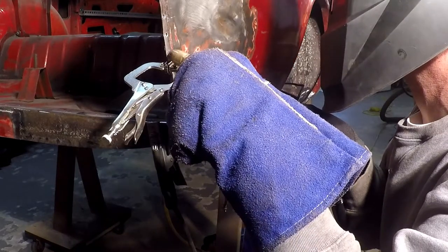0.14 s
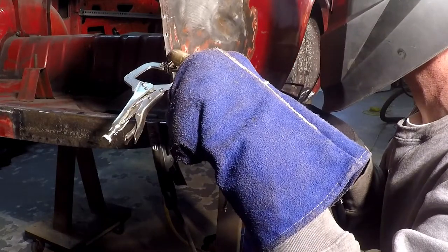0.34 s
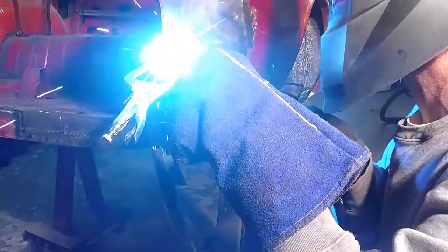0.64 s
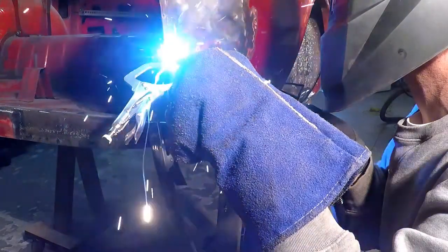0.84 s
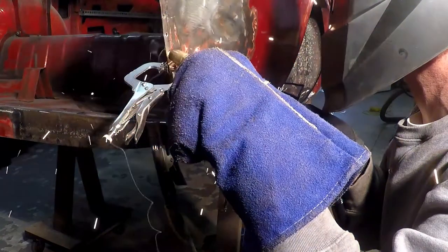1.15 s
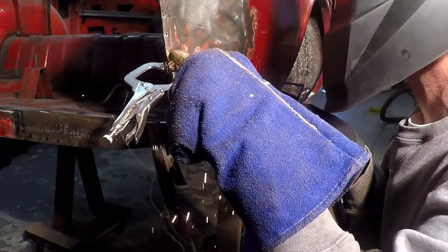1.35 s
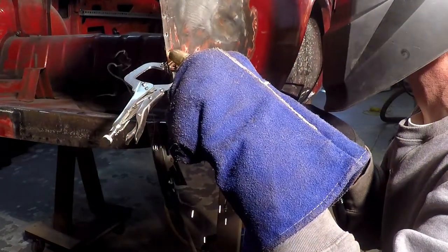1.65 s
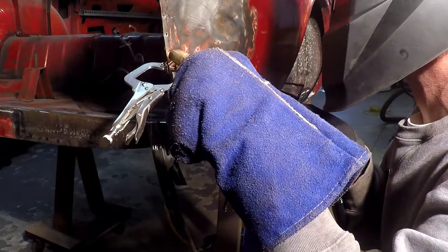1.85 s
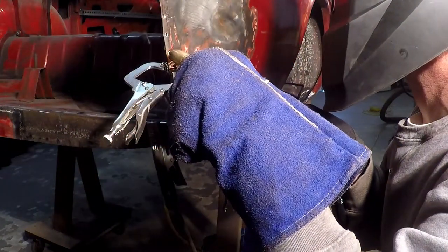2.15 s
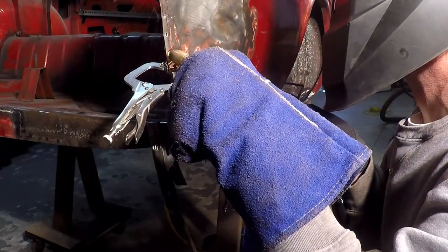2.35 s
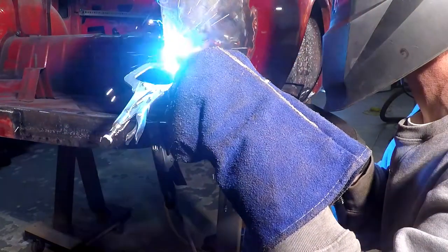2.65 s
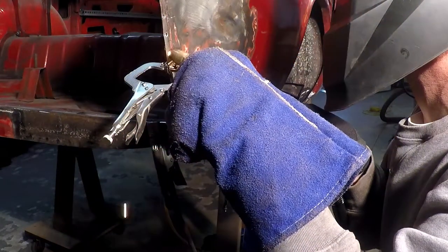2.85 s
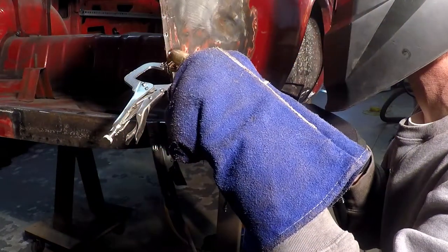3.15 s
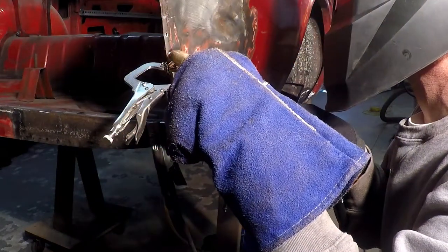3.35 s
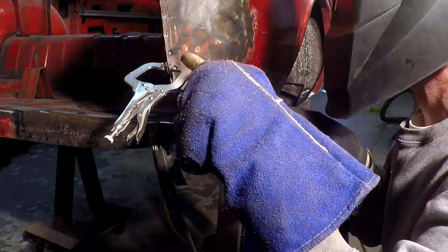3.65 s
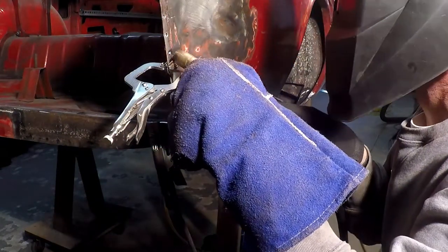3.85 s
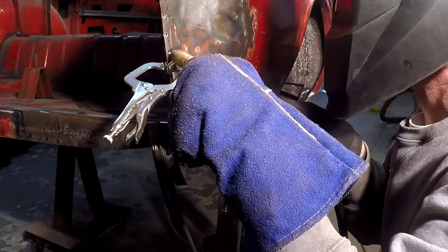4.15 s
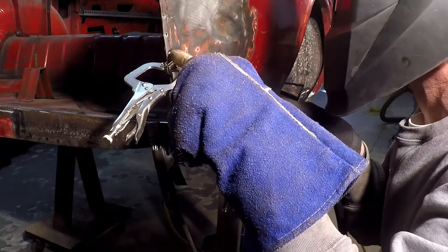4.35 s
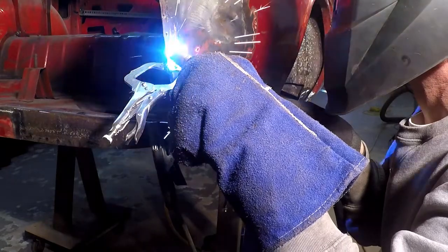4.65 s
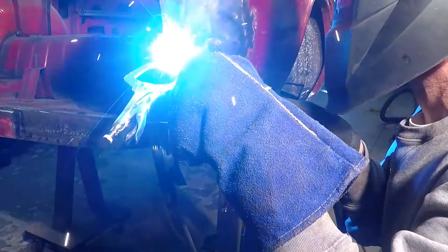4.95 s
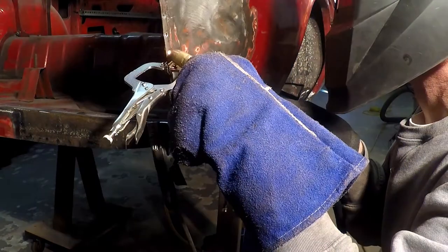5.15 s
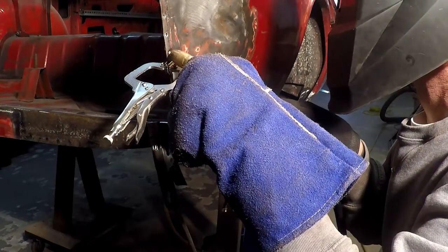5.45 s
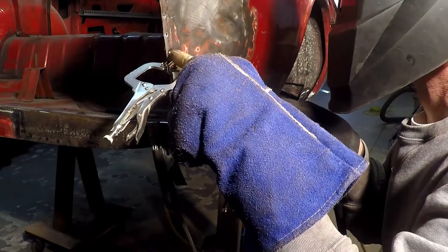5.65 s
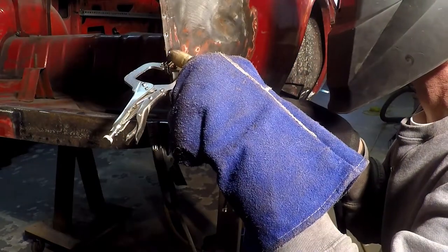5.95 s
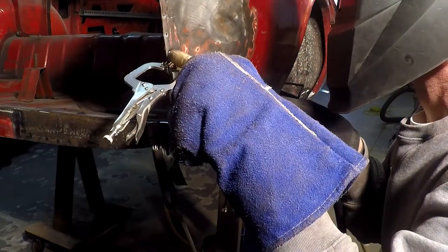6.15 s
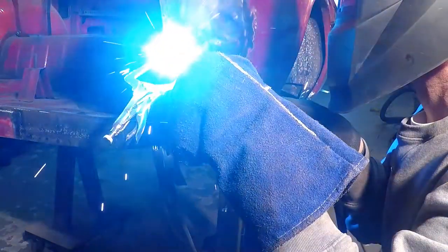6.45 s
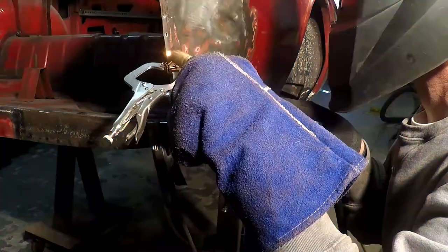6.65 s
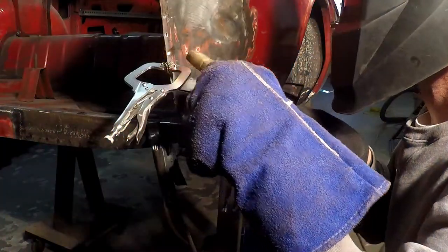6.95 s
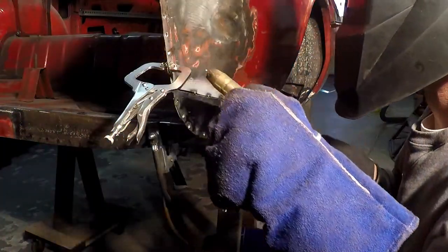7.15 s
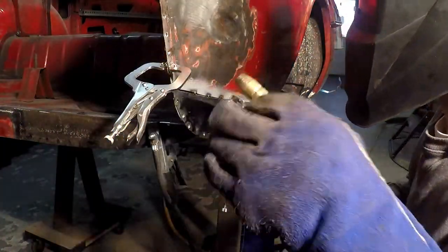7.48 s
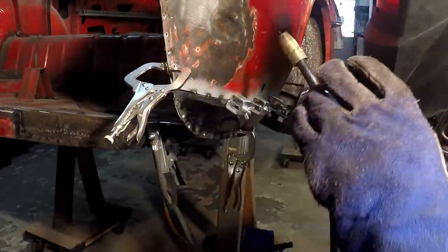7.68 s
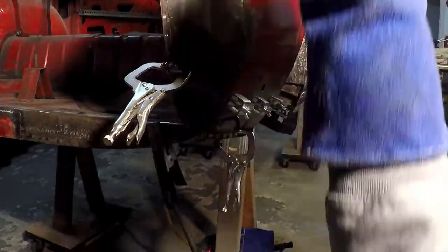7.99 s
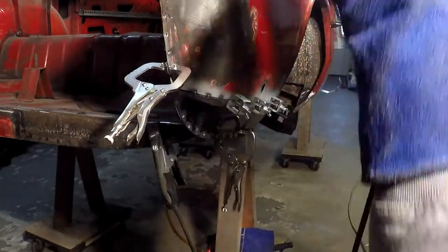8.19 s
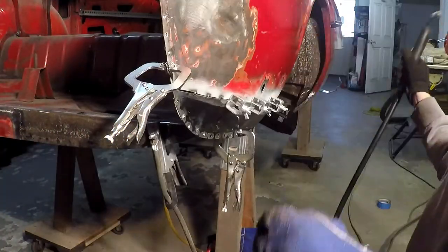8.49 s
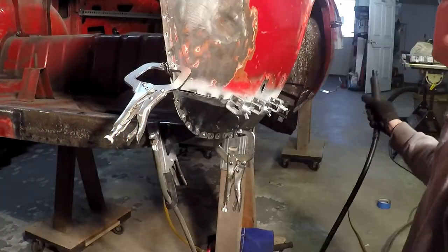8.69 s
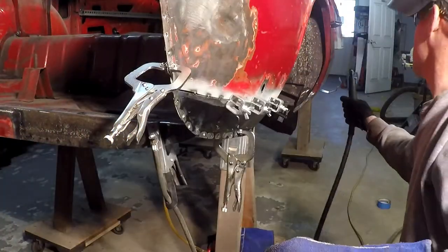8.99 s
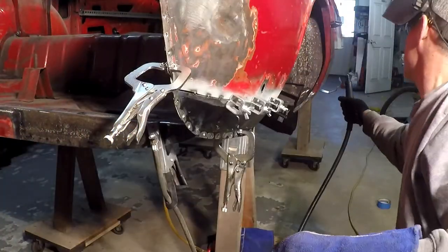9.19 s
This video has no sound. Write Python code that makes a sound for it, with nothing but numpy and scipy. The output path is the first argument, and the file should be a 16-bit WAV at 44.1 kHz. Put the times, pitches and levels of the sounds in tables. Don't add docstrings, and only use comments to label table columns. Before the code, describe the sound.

In a garage, a fan drones low through ductwork with a wavering hum. Four times a trigger clicks, gas and wire feed hiss briefly, and a welding arc spits loud irregular pops over a sizzle for about half a second. The drone ducks under each weld and creeps back. Finally, torch cable fittings tick and clink lightly. Close stereo camera microphone.

```python
import sys
import numpy as np
from scipy import signal
from scipy.fft import rfft, irfft, next_fast_len
from scipy.io import wavfile
from scipy.ndimage import uniform_filter1d, map_coordinates

SR = 44100
rng = np.random.default_rng(int(sys.argv[2]) if len(sys.argv) > 2 else 0)


def boost(x):
    u = np.asarray(x, float) / 20
    return 10 ** u


def master_out(mix):
    frames = np.transpose(np.atleast_2d(mix))
    ceiling = np.clip(frames, -1, 1)
    pcm = np.round(ceiling * 32767).astype(np.int16)
    wavfile.write(sys.argv[1], SR, pcm)


N = 411144
CLOCK = np.arange(N) / SR

# frequency in Hz, density in dB per Hz.
FAN_SPECTRUM = [(20, -34.5), (105, -32.5), (130, -35.5), (165, -6.5), (230, -6.5), (310, -14), (550, -16.5),
                (780, -17.5), (1100, -28), (1800, -41.5), (2500, -52), (4500, -55.5), (6500, -59),
                (10500, -65), (12700, -70), (13500, -100)]
# centre in Hz, width in Hz, height in dB.
DUCT_MODES = [(182, 17, 4), (341.4, 24, 3.5), (389.5, 14, 5.5), (604.3, 71, 8.5), (695.4, 11, 10),
              (767.4, 22, 7.5), (963, 25, 4), (1214, 7.7, 3), (1333, 15, 3), (1487, 16, 1)]
# centre in seconds, change in dB.
NOTE_SWELLS = [(.25, 3), (.49, -3.5), (.62, -0.5), (1.6, 4), (1.88, -1), (2.02, 5), (2.23, 8.5),
               (3.08, 2.5), (3.18, 4.5), (3.34, 8), (3.44, 5), (4.12, 5), (4.3, 0.5), (4.69, 5.5),
               (5.43, 4.5), (6.15, 6.5), (6.93, 4.5), (7.13, -4), (7.17, 5), (8.0, 3), (8.17, 5), (8.37, 2),
               (8.49, 4.5), (8.8, -1), (8.93, 4), (9.13, 6), (9.28, 1.5)]
# centre in seconds, change in dB.
NOTE_CHOKES = [(.67, -21), (.85, -15), (1.0, -6), (1.23, -17), (1.55, -23), (1.96, -15), (2.1, -11),
               (2.49, -12), (2.69, -11.5), (2.92, -14), (3.14, -5), (3.27, -21), (3.38, -25), (3.59, -5),
               (3.65, 2), (4.23, -4.5), (4.88, -9), (5.15, -13.5), (5.22, -24), (5.47, -13.5), (5.68, -7.5),
               (6.38, -4.5), (6.54, -14), (6.61, -4.5), (6.82, -7.5), (8.12, -21), (8.3, -23.5),
               (8.71, -15), (9.01, -6), (9.24, -6.5)]
# centre in seconds, frequency in Hz, level in dB.
PANEL_FLEXES = [(0.64, 158.8, -14), (2.4, 153, -17), (4.6, 155.9, -20.5), (6.297, 167, -17.5),
                (0.63, 110, -36.5), (2.56, 110, -38.5), (6.27, 270, -17), (.55, 310, -20.5),
                (3.1, 375, -26), (6.6, 430, -14), (4.74, 660, -27.5)]
# time in seconds, peak in dB, ring in dB, own note in Hz.
CABLE_TICKS = [(7.7859, -42, -7, 3810), (7.807, -34, -3.5, 4400), (7.8283, -36.5, -7, 5700),
               (7.8501, -48, 2, 4495), (7.943, -57, 6, 4278), (8.009, -33.5, -1, 5860),
               (8.0515, -36.5, -5, 3900), (8.094, -30.5, -3, 5870), (8.2885, -25.5, -7, 5830),
               (8.298, -33, 1, 6160), (8.3235, -40, -5, 3560), (8.5345, -28.5, -7, 5920),
               (8.547, -29, 1, 5910), (8.573, -28.5, -2, 5860), (8.607, -31, -0.5, 5930),
               (8.613, -34.5, -6, 7540)]
# frequency in Hz, level in dB, 60 dB decay in seconds.
FITTING_MODES = [(4400, -12, .03), (5780, -9, .09), (5960, -7, .12), (6150, -9, .08), (6500, -11, .04),
                 (7000, -6, .04), (7300, -8, .06), (7550, -8, .04)]
# frequency in Hz, density in dB per Hz.
SCUFF_SPECTRUM = [(700, -24), (1500, 11.5), (2500, -2), (4500, 0), (7000, -5), (10000, -4.5), (11500, -7),
                  (13000, -10.5), (14000, -33.5), (16000, -75)]
# time in seconds, level in dB.
CABLE_CLINKS = [
    (8.0188, -39),
    (8.062, -34.5),
    (8.1056, -31.5),
    (8.2993, -24),
    (8.5481, -29),
    (8.5822, -28.5),
    (8.615, -27.5),
]
# frequency in Hz, level in dB, 60 dB decay in seconds.
ARMATURE_MODES = [(433, 3, 0.082), (783, 7.5, 0.12), (1140, -1.5, 0.036), (1630, -0.5, 0.033),
                  (4440, 2.5, .03), (5060, 1.5, .035), (5650, -4.5, .03), (7700, -1, 0.022)]
# time in seconds, dB below 600 Hz, dB up to 3 kHz, dB above.
ARMATURE_CLACKS = [(0.407, -22, -23, -24), (0.409, -23, -26, -22), (2.379, -22, -28.5, -29),
                   (2.387, -7, -28, -28), (4.611, -18.5, -22, -21), (4.622, -19, -25.5, -27),
                   (4.642, -26, -29.5, -38), (6.143, -27, -27, -23.5), (6.15, -26.5, -26, -27),
                   (6.179, -31, -29, -43), (6.197, -29, -27, -36), (2.4, -18, -28, -35)]
# time in seconds, gas in dB, feeder in dB.
TRIGGER_PULLS = [
    (.39, 2, 2),
    (2.361, -1, -3.5),
    (4.597, 1, 1.5),
    (6.129, 0.5, 0),
]
# time in seconds, gas in dB, feeder in dB.
TRIGGER_RELEASES = [
    (1.059, -5, -2),
    (2.74, 1, 1),
    (5.0, 6, -4),
    (6.56, 2.5, 3.5),
]
# seconds since the pull, gas in dB, feeder in dB.
VALVE_OPENING = [
    (0, -56.5, -64),
    (.009, -43.5, -49.5),
    (.015, -30.5, -31),
    (.022, -25.5, -24),
    (.034, -28.5, -26),
    (.06, -38, -28),
    (.11, -39, -37),
    (.2, -62.5, -55.5),
    (.3, -70.5, -72.5),
]
# seconds since the release, gas in dB, feeder in dB.
FEED_COASTING = [
    (0, -66, -53),
    (.02, -48.5, -35),
    (.06, -53.5, -38),
    (.13, -61.5, -47.5),
    (.2, -80, -56.5),
]
# frequency in Hz, density in dB per Hz.
GAS_SPECTRUM = [(1500, -25.5), (2300, -7), (3800, -2.5), (4400, -12), (5200, -5), (6000, -3), (7500, -10.5),
                (8300, -13.5), (9600, -14.5), (12000, -23.5), (14200, -30.5), (14800, -70.5)]
# centre in Hz, width in Hz, height in dB.
HOSE_MODES = [(432, 27, 7.5), (1680, 790, -2.5), (4520, 280, 4.5), (5170, 210, 3.5), (7400, 320, 1)]
# frequency in Hz, density in dB per Hz.
FEEDER_SPECTRUM = [(250, -13), (450, 8.5), (900, -0.5), (1250, -1.5), (1600, -5), (1950, -10.5),
                   (2250, -19.5), (2600, -30), (4000, -43)]
# start in seconds, end in seconds, frequency in Hz, level in dB.
LINER_SQUEAKS = [
    (4.7, 4.76, 1530, -25.5),
    (4.75, 4.775, 1570, -26),
    (.465, .492, 1900, -31),
]
# frequency in Hz, density in dB per Hz.
SIZZLE_SPECTRUM = [(590, -27), (1000, 2), (1310, -4), (1560, 5), (2520, -18.5), (2820, 2), (4250, -10.5),
                   (6700, 5), (8310, -12), (9420, -5), (12500, -15.5), (15200, -37.5)]
# forms in seconds, full in seconds, arc falters in seconds, level in dB.
MOLTEN_POOLS = [
    (0.556, 0.578, 0.73, -27.5),
    (0.758, 0.836, 0.88, -24.5),
    (.92, 0.945, 1.043, -30.5),
    (2.439, 2.624, 2.834, -35.5),
    (4.636, 4.702, 4.776, -26),
    (4.87, 4.909, 4.96, -28),
    (6.22, 6.317, 6.15, -41),
    (6.36, 6.448, 6.65, -42),
]
# frequency in Hz, density in dB per Hz.
POP_SPECTRUM = [(600, -47.5), (1400, 0.5), (1950, 3), (2500, -4.5), (3500, -4), (6000, -0.5), (6900, 3.5),
                (7900, -12.5), (9400, -7.5), (10800, -10), (12200, -16), (15000, -12), (15900, -38),
                (16800, -61)]
# time in seconds, peak, thump, body and sharpness in dB.
FIRST_WELD = [(0.4887, -5, 7, 8, -7), (0.5544, 3, -6, -0.5, -1.5), (0.5639, -8, 1.5, 5, 2.5),
              (0.5772, -16, 4.5, 4, 2.5), (0.6175, 1.5, -6, -5, -1.5), (0.634, 0.5, -2, -7, -2),
              (0.645, -6.5, 2, -7, -1.5), (0.671, -8.5, 0.5, -0.5, 0), (0.6759, -3, 0.5, 6, -1.5),
              (0.6832, -4, 4, 3.5, -0.5), (0.69, -5, 5, 2.5, 2.5), (0.7645, 2, -3, -4, -0.5),
              (0.8114, -10, -0.5, 0, 2), (0.837, -5, -1, -5, -3), (0.8435, -5.5, -2.5, -7, -1.5),
              (0.8543, -6.5, -1.5, -1.5, 0), (0.865, -13, -2.5, -6, 4), (0.8703, -1, -3.5, -4, 0),
              (0.883, -4.5, -1, -6.5, 0), (0.889, -4.5, -2.5, -4, 0.5), (0.9462, -14, 0.5, 2.5, 0.5),
              (0.967, -3.5, 0.5, -2.5, 0), (0.971, -15, -1, 8.5, -0.5), (0.9737, -3, -2.5, -3, -1.5),
              (0.9854, -18.5, 4.5, -2, -0.5), (1.0229, -8.5, 10.5, -1, 2.5), (1.0748, -17, 14, -2, -6)]
# time in seconds, peak, thump, body and sharpness in dB.
SECOND_WELD = [(2.413, -3, 4, 2.5, 3.5), (2.4699, 2, -3.5, -3.5, 0.5), (2.4915, -15.5, 4, -9, 8),
               (2.4949, 0, -5.5, 3.5, -4), (2.5616, -2.5, 1, 2.5, 0.5), (2.5776, -2, -0.5, 0, -1.5),
               (2.5828, -4.5, -1.5, 5.5, -2.5), (2.5987, 0, -1.5, 0, -4.5), (2.6022, -10.5, 3.5, 1, 3),
               (2.6211, -4.5, 7, 2, -3.5), (2.6332, -5.5, -2.5, 4.5, -4), (2.6565, -8, -2, -0.5, -2.5),
               (2.6627, -19, 4, -5, 1.5), (2.6679, -7.5, 10, 8.5, -0.5), (2.6812, -7.5, 7, 0, -1),
               (2.6926, -7.5, 8, 5, -0.5), (2.705, -5, 7.5, 2, 4), (2.7181, -5, 3.5, 5.5, 1),
               (2.7311, -9.5, 5, 7, 4)]
# time in seconds, peak, thump, body and sharpness in dB.
THIRD_WELD = [(4.664, -4.5, 9, -1, -2.5), (4.7459, -14, 7.5, -2, 2), (4.752, -13, 3.5, -5.5, -1),
              (4.7632, -14, 3, -11, -2), (4.7665, 1, -1, 0.5, 0.5), (4.7799, -6.5, -6.5, 1, -1.5),
              (4.7843, -12.5, 3.5, -1, 1), (4.7954, -5, -1, 2.5, -4), (4.8062, -6, -2.5, 0, 1),
              (4.825, -5.5, 6, 4, 3.5), (4.8319, -0.5, -4.5, -8, -3.5), (4.8824, -2.5, -2.5, -3, -5),
              (4.902, -4.5, 3.5, 0.5, -3.5), (4.9076, -3, 3.5, 0, 0.5), (4.9251, -2, -3, -2, -3.5),
              (4.9357, -6, 5.5, 1, 0), (4.9483, -6.5, -6, -0.5, -0.5), (4.9628, -2.5, -4.5, -2, -1),
              (4.984, -8.5, 1, 0, 4), (4.9969, -10.5, 7, 7, -5.5)]
# time in seconds, peak, thump, body and sharpness in dB.
FOURTH_WELD = [(6.2073, -5, 1, -1.5, -2), (6.2262, 1, -7.5, -2.5, -0.5), (6.2885, -2, 0.5, 1, -3.5),
               (6.3034, -2.5, -2.5, 3, -1), (6.323, -2, -3, 1, -2), (6.3444, -20, 4.5, -7, 4),
               (6.3684, -6, 5.5, 2.5, -1.5), (6.3806, -8, 11.5, 8, -1.5), (6.3867, -9.5, 10.5, 8.5, 1.5),
               (6.4002, -15, 3.5, 6, -0.5), (6.41, -13, 6.5, 3, 2.5), (6.4241, -6.5, 4, -1, -4),
               (6.4331, -7, 3.5, 8.5, -4), (6.442, -10, 5, -0.5, -5), (6.451, -6.5, -6.5, 6, -2.5),
               (6.459, -6, -1, 0, -3.5), (6.4776, -5.5, 5.5, 5, -5.5), (6.4842, -16.5, -2.5, 6.5, -3),
               (6.499, -11.5, -0.5, 3, -2.5), (6.514, -9.5, 2, 6.5, -0.5), (6.5204, -9, 0, 10, 2),
               (6.536, -5, -3, -2, 0.5), (6.5493, -7, 3, -0.5, -4)]
# delay in seconds, level in dB.
NEAR_ECHOES = [(.006, -20), (0.012, -19), (0.0018, -23.5)]
# frequency in Hz, 60 dB decay in seconds.
GARAGE_DECAY = [(300, 0.065), (1000, 0.32), (1800, 0.23), (4000, 0.58), (7000, 0.46), (10000, 0.26),
                (12000, 0.2), (15000, 0.05)]
# frequency in Hz, level in dB, lead in radians, likeness of diffuse sound 0-1.
PORT_DIFFERENCE = [(40, -.3, 0, .6), (100, -.3, -.2, .6), (130, -1.5, -.2, 1), (200, -2.1, -.22, 1),
                   (300, -3.8, -.4, .98), (480, -9.5, -.65, .93), (630, -19, -1.8, .7),
                   (780, -11, -3.6, .93), (1100, -5.5, -4.05, .9), (1500, -4, -4.4, .8), (2100, 1, -5, .5),
                   (2450, 3, -5.8, .2), (2800, -1, -6.4, .3), (4500, -1, -6.15, .3), (7000, 2.3, -5.3, .05),
                   (8000, 2, -4.3, .05), (10000, -3.5, -7.3, .05), (12000, -2, -10.4, .1),
                   (15000, 0, -11, .1)]
# start in seconds, lowest at seconds, lowest in dB, fall in dB,
# recovery in dB per second.
GAIN_DUCKS = [
    (0.522, 0.787, -33, 13, 9),
    (2.586, 2.833, -31.5, 4, 9),
    (4.677, 5.003, -32.5, 10, 10),
    (6.209, 6.694, -28, 1.5, 8.5),
]


def unit(x):
    return x / np.sqrt(np.mean(x ** 2) + 1e-20)


def along(points, hz):
    f, *cols = np.transpose(points)
    return np.squeeze([np.interp(np.log(hz + 1), np.log(f + 1), c) for c in cols])


def curves(rows, outside=None):
    s, *cols = np.transpose(rows)
    return [np.interp(CLOCK, s, c, outside, outside) for c in cols]


def wobble(rate):
    knots = rng.standard_normal(int(N * rate / SR) + 4)
    return map_coordinates(knots, [np.arange(N) * rate / SR])


def filtered(x, response):
    m = 2 * next_fast_len(N // 2 + 8192)
    return irfft(rfft(x, m) * response(np.fft.rfftfreq(m, 1 / SR)), m)[..., :N]


def causal(spectrum):
    def response(hz):
        cepstrum = irfft(np.log(boost(along(spectrum, hz)) + 1e-4))
        cepstrum[1:len(hz) - 1] *= 2
        cepstrum[len(hz):] = 0
        return np.exp(rfft(cepstrum))
    return response


def noise(gain):
    return unit(filtered(rng.standard_normal((2, N)), gain))


def resonant_noise(spectrum, modes):
    def gain(hz):
        humps = sum(boost(db) / (1 + (2 * (hz - c) / w) ** 2) for c, w, db in modes)
        return boost(along(spectrum, hz)) * (1 + humps)
    return noise(gain)


def bumps(rows, width):
    return sum(db * np.exp(-((CLOCK - s) / width) ** 2) for s, db in rows)


def impulses(s, size):
    return np.bincount(np.round(s * SR).astype(int).ravel(), size.ravel(), N)


def resonator(hz, centre, width):
    return (1j * hz * width / (centre ** 2 - hz ** 2 + 1j * hz * width)) ** 2


def fan():
    gusts_db = .3 * wobble(7)
    return boost(7.0 + gusts_db) * resonant_noise(FAN_SPECTRUM, DUCT_MODES)


def drone():
    turn = 2 * np.pi * np.cumsum(192.7 + 1.94 * wobble(20)) / SR
    waver_db = 1.4 * wobble(13)
    level_db = 10 + bumps(NOTE_SWELLS, 0.034) + bumps(NOTE_CHOKES, .02) + waver_db
    return boost(level_db) * (np.sin(turn) + boost(-20) * np.sin(2 * turn))


def garage(x):
    hz, t, z = signal.stft(np.pad(x, (200, 0))[:N], SR, nperseg=256)
    decay = boost(-120 * t[:300] / along(GARAGE_DECAY, hz)[:, None])
    decay = decay / decay.sum(1, keepdims=True)
    power = signal.fftconvolve(abs(z) ** 2, decay, axes=1)[:, :len(t)]
    power[hz > 15000] = 0
    fresh = signal.stft(rng.standard_normal((2, N)), nperseg=256)[2]
    patches = uniform_filter1d(uniform_filter1d(rng.standard_normal(z.shape), 4, 0), 5, 1)
    fresh = fresh * boost(1.5 * unit(patches))
    fresh = fresh / np.sqrt(np.mean(abs(fresh) ** 2))
    return signal.istft(np.sqrt(abs(power)) * fresh, nperseg=256)[1][:, :N]


def panel():
    half_width_s = 0.022
    return sum(boost(db) * np.exp(-((CLOCK - s) / half_width_s) ** 2) * np.sin(2 * np.pi * hz * CLOCK)
               for s, hz, db in PANEL_FLEXES)


def cable():
    ring, scuff, t = np.zeros(N), np.zeros(N), np.arange(SR // 5) / SR
    for s, db, ring_db, note_hz in CABLE_TICKS:
        at = slice(round(s * SR), round(s * SR) + len(t))
        soft = boost(db - 4.0) * (1 - np.exp(-t / 0.0018))
        for hz, level, t60 in FITTING_MODES + [(note_hz, -5, .025)]:
            mode_db = ring_db + level + rng.normal(0, 1.4) - 60 * t / t60
            ring[at] += soft * boost(mode_db) * np.sin(2 * np.pi * hz * t)
        grit = boost(3.3 * rng.standard_normal(len(t) // 40 + 1)).repeat(40)[:len(t)]
        scuff[at] += soft * boost(-60 * t / 0.088) * rng.standard_normal(len(t)) * grit
    s, db = np.transpose(CABLE_CLINKS)
    drops = impulses(s, boost(db + 24.0))
    bell = lambda hz: resonator(hz, 7100, 1800) * (hz < 13000)
    return ring + filtered(scuff, causal(SCUFF_SPECTRUM)) + filtered(drops, bell)


def solenoid():
    out, t = np.zeros(N), np.arange(SR // 5) / SR
    for s, *band_db in ARMATURE_CLACKS:
        onset = 1 - np.exp(-t / 0.00071)
        for hz, level, t60 in ARMATURE_MODES:
            mode_db = band_db[(hz > 600) + (hz > 3000)] + level - 60 * t / t60
            phase = 2 * np.pi * rng.random()
            out[round(s * SR):][:len(t)] += onset * boost(mode_db) * np.sin(2 * np.pi * hz * t + phase)
    return out


def feed():
    moves = [np.add(VALVE_OPENING, pull) for pull in TRIGGER_PULLS]
    moves += [np.add(FEED_COASTING, stop) for stop in TRIGGER_RELEASES]
    gas_db, feeder_db = np.max([curves(rows, -120) for rows in moves], 0)
    jerks_db = 3.5 * wobble(140)
    gas = boost(gas_db + jerks_db / 2) * resonant_noise(GAS_SPECTRUM, HOSE_MODES)
    feeder = boost(feeder_db + 8.0 + jerks_db) * resonant_noise(FEEDER_SPECTRUM, HOSE_MODES)
    squeak = np.zeros(N)
    for start, end, hz, db in LINER_SQUEAKS:
        arch = np.sin(np.pi * np.clip((CLOCK - start) / (end - start), 0, 1))
        squeak += boost(db + jerks_db) * arch * np.sin(2 * np.pi * hz * CLOCK)
    return filtered(gas + feeder + squeak, lambda hz: hz < 14300)


def pool():
    cold_db, freeze_db_per_s, freeze_s = -19, 153, 0.14
    shapes = [[(forms, db + cold_db), (full, db), (falters, db), (falters + 0.11, db - freeze_s * freeze_db_per_s)]
              for forms, full, falters, db in MOLTEN_POOLS]
    db = np.max([curves(rows, -120)[0] for rows in shapes], 0)
    level = uniform_filter1d(boost(db - 4), 300)
    spit_db = 3.5 * wobble(900) + 1.5 * wobble(60)
    sizzle = noise(lambda hz: boost(along(SIZZLE_SPECTRUM, hz)) * (hz < 15300))
    return level * unit(boost(spit_db) * sizzle)


def arc():
    s, db, thump_db, body_db, sharp_db = np.transpose(FIRST_WELD + SECOND_WELD + THIRD_WELD + FOURTH_WELD)
    blows = lambda level_db: -impulses(s - .00005, boost(level_db))
    top = lambda hz: 1 / (1 + (7800 / (hz + 1)) ** 16)
    air = lambda hz: 1 / (1 + (12500 / (hz + 1)) ** 16)
    walls = lambda hz: 1 + sum(boost(loss_db) * np.exp(-2j * np.pi * hz * delay) for delay, loss_db in NEAR_ECHOES)

    lag = .0001 + .0003 * rng.random((len(s), 3))
    share = .2 * rng.standard_normal((len(s), 3))
    pieces = impulses(s[:, None] + lag, boost(db + 13.0)[:, None] * share)
    crack = filtered(blows(db + 13) + pieces, lambda hz: 1j * hz / (2500 + 1j * hz) * (1 - top(hz)))
    body = filtered(blows(db + body_db + 13), lambda hz: 2500 / (2500 + 1j * hz))
    edge = filtered(blows(db + sharp_db + 10.0), lambda hz: top(hz) * (1 - air(hz)))
    edge += filtered(blows(2.2 * db + sharp_db + 7.5), air)

    swing = lambda hz: resonator(hz, 560, 600) * np.exp(-2j * np.pi * hz * .0004)
    thump = filtered(blows(db + thump_db + 26), swing)
    pops = filtered(crack + body + edge, lambda hz: causal(POP_SPECTRUM)(hz) * walls(hz)) + thump

    spray_t60 = 0.0031
    fade = boost(-60 * np.arange(800) / SR / spray_t60)
    puff = signal.fftconvolve(blows(db + sharp_db - 16), fade)[:N]
    spray_gain = lambda hz: boost(along(POP_SPECTRUM, hz)) * top(hz) * walls(hz) * (1 - .7 * air(hz)) * (hz < 15500)
    spray = filtered(10 * puff * rng.standard_normal((2, N)), spray_gain)
    return pops, spray


def ports(near, diffuse):
    alike = lambda hz: np.clip(along(PORT_DIFFERENCE, hz)[2], 0, 1)
    left = near + filtered(diffuse, lambda hz: np.sqrt([alike(hz), 1 - alike(hz)])).sum(0)

    def path(hz):
        db, lead, _ = along(PORT_DIFFERENCE, hz)
        return boost(db) * np.exp(1j * lead)
    return np.array([filtered(left, path), near + diffuse[0]])


def gain_db():
    open_db, linger_s = -21, 0.19
    ducks = []
    for s, low, db, fall_db, rate in GAIN_DUCKS:
        falling = db + fall_db * (low - CLOCK) / (low - s)
        creeping = db + rate * np.clip(CLOCK - low - linger_s, 0, None)
        ducks.append(np.where(CLOCK < low, falling, creeping))
    return uniform_filter1d(np.minimum(open_db, np.min(ducks, 0)), size=4000)


def scene():
    gain = boost(gain_db())
    pops, spray = arc()
    near = (pops + cable() + solenoid()) / gain
    hiss = (feed() + pool() + spray) / gain
    room = filtered(garage(near + hiss[0]), lambda hz: hz > 130)
    end = np.clip((N - np.arange(N)) / 100, 0, 1)
    direct = near + panel() / gain + drone()
    diffuse = fan() + hiss + boost(-5.5) * room
    return ports(end * direct, end * diffuse)


def low_pass(x):
    return signal.sosfilt(signal.butter(12, 16490, fs=SR, output="sos"), x)


def record(dry):
    x = dry * boost(gain_db())
    x = x / (1 + abs(x / 1.05) ** 8) ** (1 / 8)
    return low_pass(x)


dry = scene()
out = record(dry)
master_out(out)
```